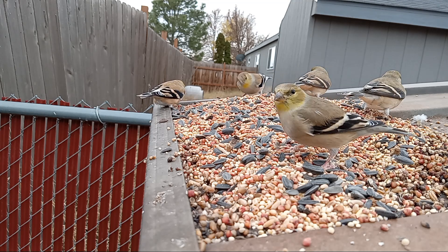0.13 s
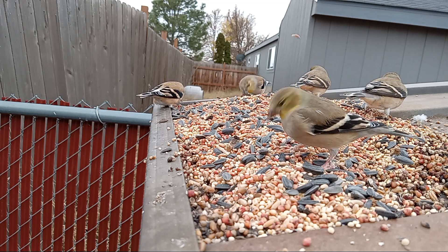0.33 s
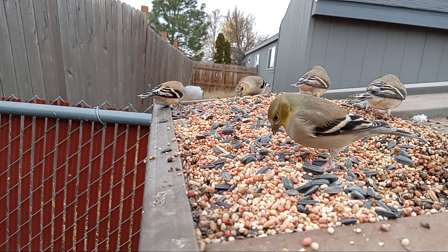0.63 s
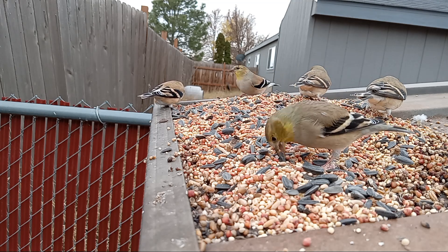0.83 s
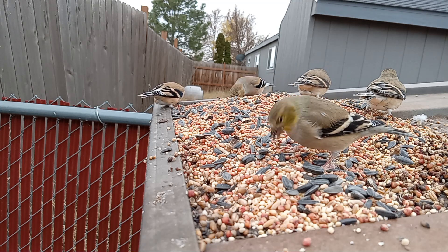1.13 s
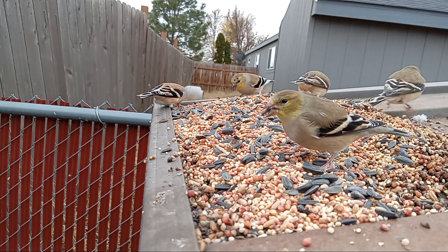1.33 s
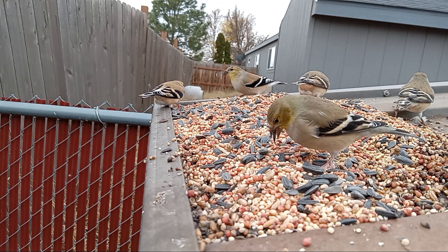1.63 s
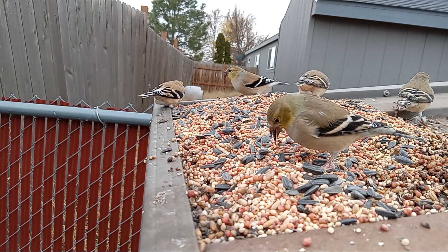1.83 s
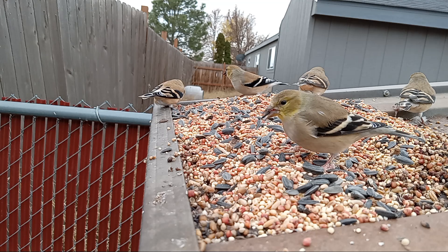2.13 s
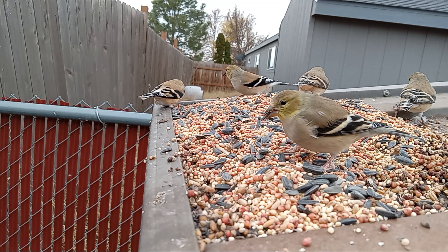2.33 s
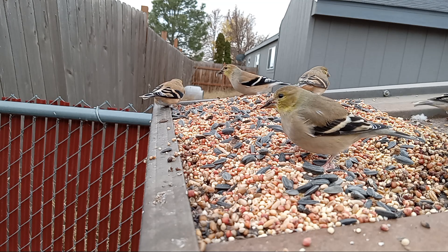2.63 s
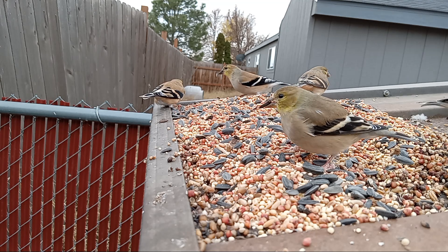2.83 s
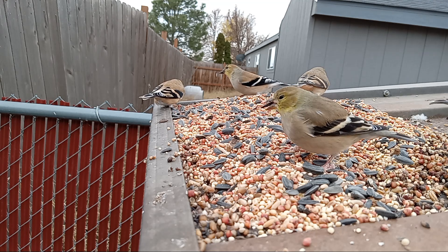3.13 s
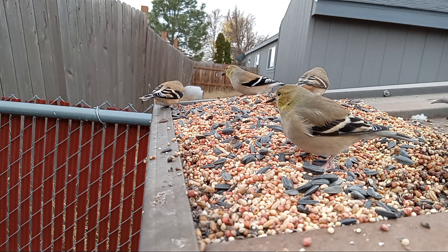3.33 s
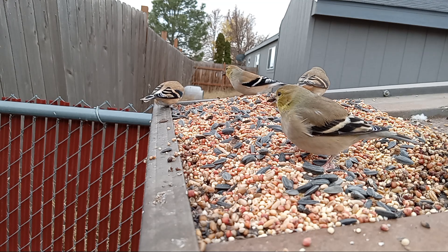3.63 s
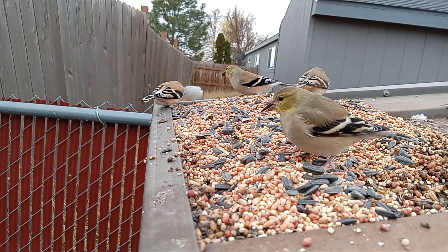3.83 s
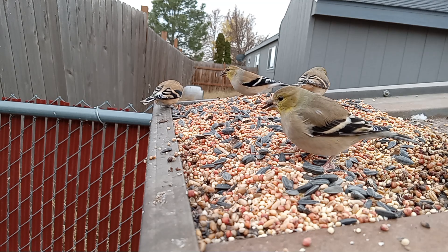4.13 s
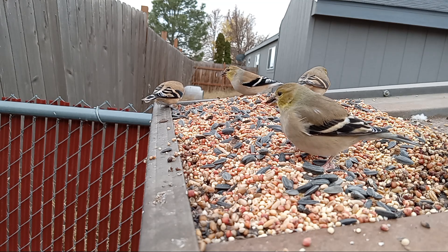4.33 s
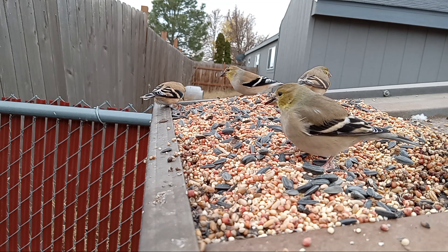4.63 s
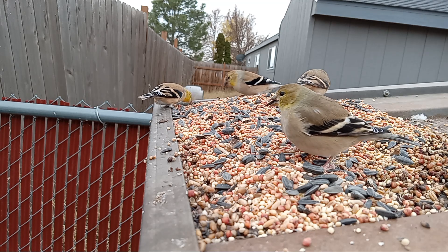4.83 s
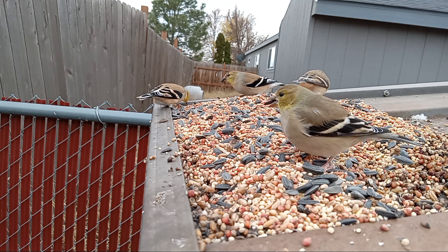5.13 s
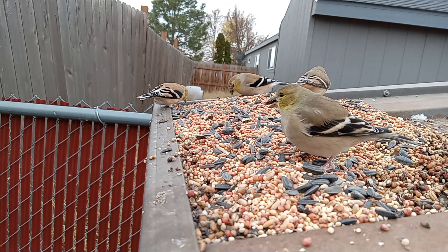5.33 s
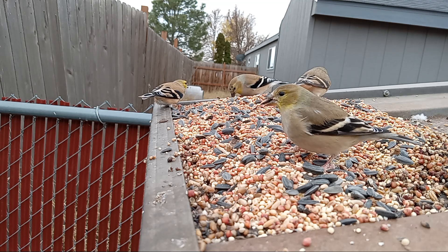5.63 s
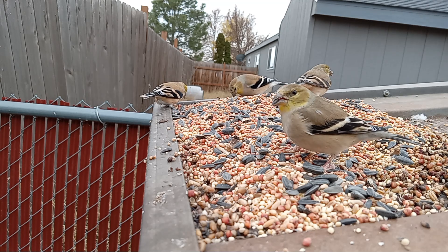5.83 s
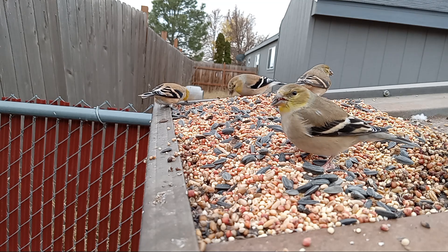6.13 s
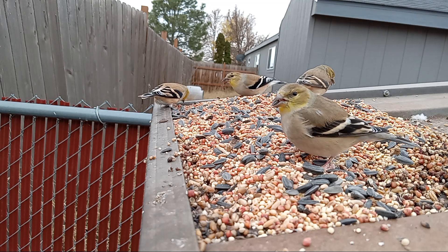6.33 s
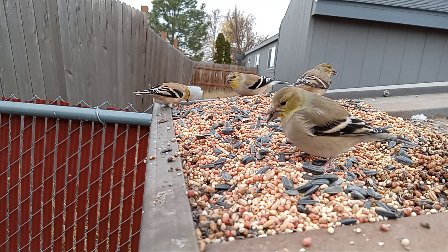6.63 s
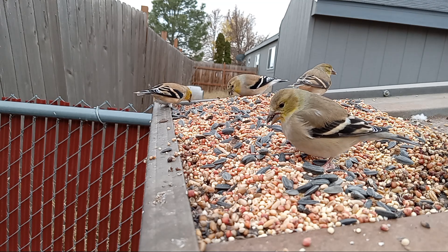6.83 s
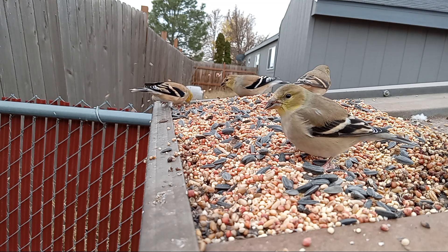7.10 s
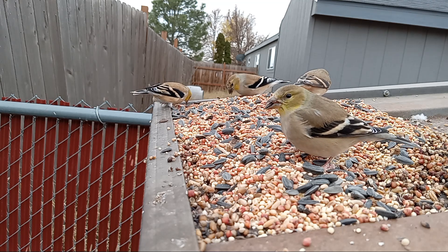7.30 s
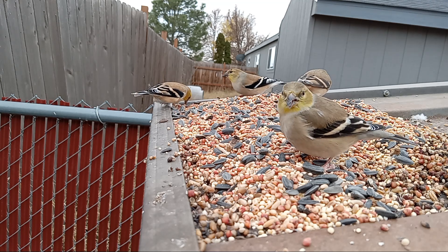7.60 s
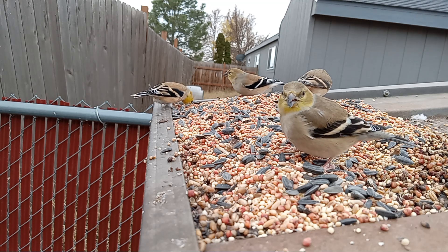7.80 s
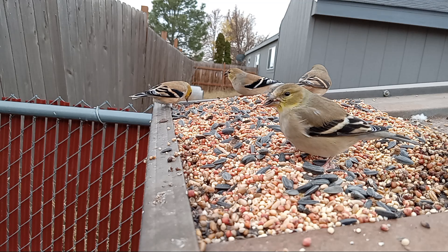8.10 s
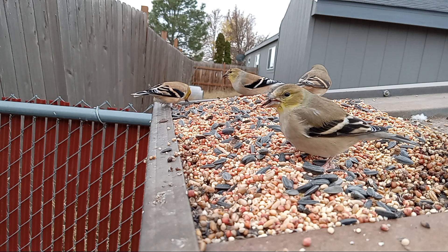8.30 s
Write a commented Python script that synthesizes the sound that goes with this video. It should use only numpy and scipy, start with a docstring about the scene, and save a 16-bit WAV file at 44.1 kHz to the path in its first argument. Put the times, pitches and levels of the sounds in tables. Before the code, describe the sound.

Several finches feed on a seed-covered tray, heard from its edge, extremely close. Beaks crunch into seed with bright clicks and hollow low thuds, sparse at first, crowding into a busy burst around two to three seconds. Dry bill clicks and cracking husks follow, then scattered pecks, soft hops and one quick little rattle near seven seconds. The quiet yard adds only a faint low rumble and thin hiss.

```python
"""Finches on a seed tray

Birds feed a hand's width from a microphone resting on their tray, in a quiet yard.
Beaks and feet crunch through seed (noise bursts), then strike the tray (fading noise and low, beating tones).
Husks, bills and loose seed click and crackle (filtered noise bursts); nibbling is softer noise.
Weight shifts hum (beating tones), dry ticks sound singly or rattle, and thin whistles (gliding sines) echo.
Behind them lies a faint yard rumble with a thin hiss (filtered noise)."""
import sys
import numpy as np
from scipy import signal
from scipy.fft import rfft, irfft, next_fast_len
from scipy.io import wavfile
from scipy.ndimage import uniform_filter1d, map_coordinates

SR = 44100
rng = np.random.default_rng(int(sys.argv[2]) if len(sys.argv) > 2 else 0)


def wrap_up_sound(samples):
    """Save the sound to the file named by the first command line argument, as 16-bit audio."""
    columns = np.atleast_2d(samples).T
    # keep every value between -1 and 1, then stretch to whole-number steps
    tamed = np.clip(columns, -1, 1)
    steps = np.round(tamed * 32767).astype(np.int16)
    wavfile.write(sys.argv[1], SR, steps)


N = 373086  # length in samples

# Levels in the tables are starting levels: later filters and gains shape them further.
# Beaks striking through seed to the tray: [contact t/s, seed click level/dB, knock level/dB,
# tray boom level/dB, boom centre f/Hz, first contact over the ring level/dB]
PECKS = [(0.4546, -20.5, -38.5, -49, 655, 9), (0.5171, -27.5, -47, -54.5, 429, 13),
         (0.5967, -22, -39, -52.5, 640, 9), (1.0234, -31.5, -46, -33, 426, 10),
         (1.3, -24.0, -48, -53.5, 329, 1.5), (1.5231, -35.5, -38.5, -45, 537, 14.5),
         (1.7997, -31.5, -39.5, -26.5, 294, 12.0), (1.9778, -25, -38.5, -25.5, 163.4, 10.5),
         (2.1646, -30.5, -33, -32.5, 439.6, 12.5), (2.331, -33, -38.0, -29.5, 158, 9),
         (2.4239, -30.5, -31, -34.5, 396, 12.5), (2.438, -22.5, -32.5, -33, 320, 9.5),
         (2.6226, -30, -33, -34.5, 482, 12), (2.657, -44.5, -30, -36, 750, 16),
         (2.7023, -34.5, -33.5, -32, 260.5, 12), (2.7357, -33.5, -34.5, -35, 208.7, 9),
         (2.8136, -24, -28.5, -38, 324.6, 6), (3.076, -36, -53.5, -39.5, 381, 0),
         (3.2495, -23.5, -33, -40, 520.0, 10.5), (4.2895, -28, -27, -41, 1007, 12),
         (4.4153, -30, -32, -45, 400, 9), (4.4352, -23, -37, -35, 334, 4),
         (4.8873, -27.5, -47.5, -52, 501, 7.5), (5.1193, -26.5, -50.5, -48.5, 337, 7.5),
         (5.5556, -27, -31.5, -34.5, 332, 5), (5.7524, -28, -37, -34.5, 393, 7),
         (5.8433, -25.5, -51, -46.5, 352, 5), (6.7438, -35.5, -41, -50, 348, 10.5),
         (7.1126, -33, -47.5, -43.5, 291, 14.5)]
# Feet landing softly on seed: [contact t/s, seed click level/dB, knock level/dB,
# tray boom level/dB, boom centre f/Hz]
HOPS = [(0.0024, -39, -54.5, -41.5, 300), (5.3133, -23.5, -33, -42.5, 436.0),
        (5.3416, -25, -34.5, -34, 367), (6.4094, -30, -33.5, -35.5, 328.4), (6.68, -39.5, -34, -39.0, 450),
        (8.178, -31.5, -41.5, -34, 451)]
# Husks cracked in the beak or dropped on the pile: [t/s, click level/dB, clack level/dB]
SNAPS = [(0.0261, -31.5, -51), (0.3636, -35, -42.5), (0.7824, -30, -30), (0.7905, -20.5, -37),
         (0.9559, -42, -50.5), (1.061, -39.5, -46.0), (1.349, -32, -49), (2.9375, -31, -42.5),
         (3.072, -37, -41), (3.927, -34.5, -45.5), (4.2852, -35.5, -29), (5.107, -34, -42),
         (5.659, -34, -47), (6.7964, -37, -47), (6.9969, -36.5, -42), (7.301, -38.5, -28.5),
         (7.3231, -36, -31), (7.8102, -53.5, -52), (8.112, -46, -47.5)]
# Loose seed pushed aside: [height of the push t/s, half length t/s, level/dB]
SHOVES = [(0.071, 0.066, -56.5), (0.644, 0.028, -46), (1.31, 0.014, -42.5), (1.426, 0.014, -49.5),
          (2.588, 0.028, -37), (2.696, 0.085, -41.5), (2.867, 0.023, -39), (3.356, 0.066, -47.5),
          (3.949, 0.034, -48.5), (4.369, 0.023, -43.5), (5.297, 0.0167, -44), (5.643, 0.039, -43.5),
          (5.861, 0.022, -43.5), (6.456, 0.042, -44), (6.661, 0.045, -46), (6.957, 0.075, -54.5),
          (8.236, 0.06, -58.5)]
# Tray humming as a bird shifts its weight: [height t/s, f/Hz at the height, level/dB]
SWAYS = [(0.095, 95, -40), (0.09, 165, -45), (0.07, 420, -51), (1.09, 270, -41), (1.92, 320, -39),
         (2.19, 158, -38), (2.37, 105, -41), (2.52, 150, -39.5), (4.52, 160, -46), (4.6, 340, -52),
         (6.47, 165, -47), (7.16, 370, -47), (7.12, 130, -46), (7.25, 160, -50), (8.32, 205, -44)]
# The nearest bill clicking on the seed it turns: [t/s, level/dB]
BILL_CLICKS = [(2.5499, -30.5), (3.0698, -27), (3.2423, -19), (3.3052, -21.5), (3.3393, -28), (3.378, -31),
               (3.438, -34), (3.8982, -20.5), (3.948, -29.5), (3.967, -34), (4.8501, -31.5), (4.898, -30),
               (7.768, -47.5)]
# Dry ticks, very short and bright: [t/s, level/dB]
TICKS = [(0.2117, -33.5), (3.1512, -33), (4.6131, -40.5)]
# Faint whistles: [start t/s, length t/s, start f/Hz, end f/Hz, level/dB before the echo]
WHISTLES = [(0.8, 0.11, 9300, 8300, -58.5), (0.916, 0.12, 7950, 7630, -66.5),
            (4.748, 0.038, 3300, 3190, -73.5), (7.339, 0.11, 6450, 6340, -74),
            (7.922, 0.116, 3410, 3290, -72.5)]
# The tray's low modes (its natural tones): [f/Hz]
TRAY_MODES = [97.7, 160, 214, 308, 337.2, 393.5, 441.3, 512.4]
# Time for tray and seed bed to fade by 60 dB: [f/Hz, fade t/s]
RING_FADE = [(100, 0.84), (350, 0.6), (750, 0.33), (3000, 0.19), (6000, 0.1)]
# Tone colour of a blow on the tray: [f/Hz, level/dB]
BLOW_COLOUR = [(35, 4), (85, 19.5), (600, 16), (1300, 9.5), (3000, 0.5), (4000, -5.5), (6200, -5.5),
               (8200, -13.5)]
# Tone colour of a breaking husk: [f/Hz, level/dB]
HUSK_COLOUR = [(200, -40), (1050, -7.5), (1600, 4.5), (2900, 3.5), (5300, 5), (7700, -2.5), (10500, -5.5)]
# Tone colour of shifting seed: [f/Hz, level/dB]
LOOSE_COLOUR = [(200, -5.5), (2000, 2.5), (4000, 0.5), (5800, 7), (7800, 0)]
# Tone colour of the rattle's ticks: [f/Hz, level/dB]
RATTLE_COLOUR = [(350, -12), (850, 9), (2400, 9), (6000, -8.5)]
# Resonances of a bill on seed, which also colour the dry ticks: [f/Hz, level/dB]
BILL_COLOUR = [(1400, -32.5), (2600, -4), (4400, -13), (5500, 7.5), (6850, 0), (7550, 1), (9500, -10.5)]
# Tone colour of the yard, before its overall level is set: [f/Hz, level/dB]
YARD_COLOUR = [(25, -40.5), (70, 1), (190, -6.5), (420, -21), (1500, -24), (6000, -38)]
# How the microphone passes each pitch: [f/Hz, level/dB]
MICROPHONE = [(8000, 0.5), (10500, -13.5), (13500, -30), (15500, -17.5)]

YARD_DB = -66.5
CRUSH_S = 0.04  # length of the crunch before a blow
TOP_HZ = 16000  # a steep cut removes everything from here up
KNOCK_HZ, CLICK_HZ = 1700, 6500  # where the knock and the click lie
BLOW_DB, HOP_CONTACT_DB = -3.5, -6.5  # gain of blows except the boom tone; foot contact over the ring
BOOM_DB, BOOM_RISE_S, BOOM_DECAY_S = -3.5, 0.0075, 0.036  # the mode that answers most at the struck spot
BOOM_SAG = 0.2  # the boom starts sharp by this share and sinks to its centre
BUILD_CYCLES = 4  # build-up time of a tray mode in cycles, so the lowest come last
SNAP_RING_DB, SNAP_CLACK_DB, SNAP_CLICK_DB = -6.5, 4.5, 0.5  # weights of ring, clack and click
RATTLE_S, RATTLE_GAP_S, RATTLE_DB = 6.891, 0.0173, -39.5  # start, average spacing, middle level
SWAY_S = 0.07  # half length of a hum
SWAY_SINK = 1.2  # the hum sinks by this many octaves a second as lower modes take over
BEAT_DEPTH, BEAT_RATE = 0.68, 65  # strength of the beating; random points a second


def amp(db):
    """Turn decibels into gain."""
    return 10 ** (np.asarray(db) / 20)


def unit(x):
    """Scale to an average strength (rms) of 1."""
    return x / np.sqrt(np.mean(x ** 2) + 1e-20)


def along(points, hz):
    """Read (f/Hz, value) points along a log pitch axis."""
    f, value = np.transpose(points)
    return np.interp(np.log(hz + 1), np.log(f + 1), value)


def wobble(rate, size):
    """Draw a smooth random curve with rate points a second."""
    points = rng.standard_normal(int(size * rate / SR) + 4)
    return map_coordinates(points, [np.arange(size) * rate / SR])


def coloured(x, *spectra):
    """Filter a sound by the sum of (f/Hz, level/dB) curves, with no sound ahead of its cause."""
    m = 2 * next_fast_len(len(x) // 2 + 2048)
    hz = np.fft.rfftfreq(m, 1 / SR)
    gain = amp(sum(along(s, hz) for s in spectra))
    # folding the cepstrum gives the filter its earliest possible response
    cepstrum = irfft(np.log(gain))
    cepstrum[1:m // 2] *= 2
    cepstrum[m // 2 + 1:] = 0
    return irfft(rfft(x, m) * np.exp(rfft(cepstrum)), m)[:len(x)]


def add(track, s, sound):
    """Mix a sound into the track from time s, trimming what lies outside."""
    start = round(s * SR)
    part = sound[max(-start, 0):max(N - start, 0)]
    track[max(start, 0):][:len(part)] += part


def contact(t, life):
    """A hard touch: a brief crunch with one sharp push at its height."""
    u = 2 * t / life
    crunch = rng.standard_normal(len(t)) * (u * np.exp(-u)) ** 2
    crunch /= np.linalg.norm(crunch)
    crunch[np.argmax(u >= 1)] += 0.7
    return crunch * np.sqrt(life * SR) / np.linalg.norm(crunch)


def dense_ring(t, speed):
    """Crowded upper modes and jostled seeds ring as noise; the treble dies first."""
    level_db = 2.7 * wobble(500, len(t))
    noise = unit(rng.standard_normal(len(t)) * amp(level_db))
    hz, s, z = signal.stft(noise, SR, nperseg=256)
    fade_db = -60 * s / along(RING_FADE, hz)[:, None]
    return signal.istft(z * amp(speed * fade_db), SR)[1][:len(t)]


def tray_modes(t, scatter_db):
    """The low modes build up and fade, in a new random mix for each strike."""
    hz = np.array(TRAY_MODES)
    strength = unit(amp(scatter_db * rng.standard_normal(len(hz))))
    gain = strength * rng.choice([-1, 1], len(hz))
    fade = np.exp(-np.log(1000) * t / along(RING_FADE, hz)[:, None])
    build = 1 - np.exp(-hz[:, None] * t / BUILD_CYCLES)
    return gain @ (build * fade * np.sin(2 * np.pi * hz[:, None] * t))


def own_resonances(depth_db, count=80):
    """Each sound gets its own random peaks and gaps about an even level: (f/Hz, level/dB)."""
    hz = np.geomspace(400, TOP_HZ, count)
    power = amp(depth_db * np.clip(rng.standard_normal(count), -2, 2)) ** 2
    power /= uniform_filter1d(power, size=count // 7)
    power[0] = 1  # leaves the bass alone
    return list(zip(hz, 10 * np.log10(power)))


def after_crush(sound, rise, crush_db):
    """Seed gives way in a swelling noise crunch just before the sound."""
    before = np.arange(round(CRUSH_S * SR))[::-1] / SR
    crush = amp(crush_db) * rng.standard_normal(len(before)) * np.exp(-before / rise)
    return np.concatenate([crush, sound])


def beating(hz, swell):
    """Close modes make a swell waver in level and pitch; hz is given per sample."""
    waver = wobble(BEAT_RATE, len(hz)) + 1j * wobble(BEAT_RATE, len(hz))
    swing = swell * (1 + BEAT_DEPTH * waver)
    swing *= np.linalg.norm(swell) / np.linalg.norm(swing)
    return np.imag(swing * np.exp(2j * np.pi * np.cumsum(hz) / SR))


def grains(rate, spread_db):
    """Scatter about rate impulses a second, very unequal in size, with rms 1."""
    hit = rng.random(N) < rate / SR
    return unit(hit * rng.standard_normal(N) * amp(spread_db * rng.standard_normal(N)))


def tray_blows(rows, crush_rise):
    """Each blow brushes the seed, hits bottom, and the tray rings."""
    out, t = np.zeros(N), np.arange(3 * SR // 4) / SR
    for s, click, knock, boom, boom_hz, contact_db in rows:
        upper = coloured(dense_ring(t, speed=0.83), [(380, -4.5), (700, 2.5)])
        touch = amp(contact_db) * contact(t, life=0.0021)
        blow = touch + upper + amp(-23.5) * tray_modes(t, scatter_db=2.5)
        blow = after_crush(blow, rise=crush_rise, crush_db=-3.5)
        # the spot that is struck decides which of the low modes answer
        low = [(boom_hz / 5, boom - 25), (boom_hz / 2, boom - 8),
               (boom_hz, boom + 2), (boom_hz * 1.47, boom - 8)]
        force = low + [(KNOCK_HZ, knock), (CLICK_HZ, click)]
        spot = own_resonances(depth_db=5)
        add(out, s - CRUSH_S, amp(BLOW_DB) * coloured(blow, BLOW_COLOUR, force, spot))
        swell = (1 - np.exp(-t / BOOM_RISE_S)) * np.exp(-t / BOOM_DECAY_S)
        hz = boom_hz * (1 + BOOM_SAG * np.exp(-2 * t / BOOM_DECAY_S))
        add(out, s, amp(boom + BOOM_DB) * beating(hz, swell))
    return out


def yard():
    """Filtered noise makes a distant rumble and a thin hiss of air, slowly varying in level."""
    air = unit(coloured(rng.standard_normal(N), YARD_COLOUR))
    return amp(YARD_DB + 1.1 * wobble(2.5, N)) * air


def sways():
    """Shifting weight stirs close low modes: an uneven, sinking hum with no click."""
    out, t = np.zeros(N), np.arange(SR // 2) / SR
    t = t - t.mean()
    for s, hz, db in SWAYS:
        sinking_hz = hz * 2 ** (-SWAY_SINK * t)
        swell = np.exp(-(t / SWAY_S) ** 2)
        add(out, s + t[0], amp(db) * beating(sinking_hz, swell))
    return out


def loose_seed():
    """Under feet and beaks, seeds of several sizes click against each other."""
    t = np.arange(N) / SR
    push_power = sum(amp(db) ** 2 * np.exp(-2 * ((t - s) / half) ** 2) for s, half, db in SHOVES)
    short, clicks = t[:SR // 10], np.zeros(N)
    for _ in range(10):  # ten different seed sounds
        tick = contact(short, life=0.0005) + amp(-17) * dense_ring(short, speed=1.3)
        tick = coloured(tick, LOOSE_COLOUR, own_resonances(depth_db=9))
        clicks += signal.fftconvolve(grains(rate=85, spread_db=1.5), tick)[:N]
    return np.sqrt(push_power) * unit(clicks)


def hops():
    """Feet are cushioned by the seed: mostly ring, little contact."""
    return tray_blows([(*hop, HOP_CONTACT_DB) for hop in HOPS], crush_rise=0.0068)


def snaps():
    """A husk strains and breaks: bright, short, too light to move the tray."""
    out, t = np.zeros(N), np.arange(SR // 4) / SR
    for s, click, clack in SNAPS:
        crack = contact(t, life=0.0013) + amp(SNAP_RING_DB) * dense_ring(t, speed=1.32)
        crack = after_crush(crack, rise=0.0012, crush_db=-10)
        seed = own_resonances(depth_db=5)
        force = [(3600, clack + SNAP_CLACK_DB), (5500, click + SNAP_CLICK_DB)]
        add(out, s - CRUSH_S, coloured(crack, HUSK_COLOUR, force, seed))
    return out


def nibbling():
    """Bills rub softly on their seeds at random moments throughout."""
    out, t = np.zeros(N), np.arange(SR // 10) / SR
    for s in rng.uniform(0, N / SR, size=60):
        rub = after_crush(dense_ring(t, speed=1), rise=0.004, crush_db=0)
        seed = own_resonances(depth_db=7)
        add(out, s, amp(rng.uniform(-8, 0)) * coloured(rub, BILL_COLOUR, seed))
    return amp(-79.5) * unit(out)


def ticks():
    """Dry ticks: very short, bright clicks with no ring."""
    out, t = np.zeros(N), np.arange(SR // 10) / SR
    for s, db in TICKS:
        add(out, s, amp(db) * coloured(contact(t, life=0.00086), BILL_COLOUR))
    return out


def pecks():
    """A beak lands hard: crunching seed, a sharp contact, then the ring."""
    return tray_blows(PECKS, crush_rise=0.0037)


def whistles():
    """Faint, nearly pure calls glide down and echo between fence and house."""
    out = np.zeros(N)
    for s, length, start_hz, end_hz, db in WHISTLES:
        u = np.linspace(0, 1, int(length * SR))
        hz = start_hz + (end_hz - start_hz) * u
        swell = np.sqrt(np.abs(np.sin(np.pi * u)))
        add(out, s, amp(db) * swell * np.sin(2 * np.pi * np.cumsum(hz) / SR))
    t = np.arange(SR // 2) / SR
    echo = rng.standard_normal(len(t)) * np.exp(-t / 0.063)
    return out + 0.55 * signal.fftconvolve(out, echo / np.linalg.norm(echo))[:N]


def bill_clicks():
    """The seed slips, then the bill shuts on it: high and dry, around the same few resonances."""
    out, t = np.zeros(N), np.arange(SR // 10) / SR
    for s, db in BILL_CLICKS:
        click = contact(t, life=0.0014) + amp(-9) * dense_ring(t, speed=1)
        click = after_crush(click, rise=0.0025, crush_db=-5.5)
        click = coloured(click, BILL_COLOUR, own_resonances(depth_db=4))
        add(out, s - CRUSH_S, amp(db) * click)
    return out


def rattle(count):
    """A quick, uneven run of differing dry ticks, perhaps a claw slipping along the rim."""
    out, t = np.zeros(N), np.arange(SR // 10) / SR
    for k, (late, louder) in enumerate(rng.standard_normal((count, 2))):
        tick = contact(t, life=0.0013) + amp(-15) * dense_ring(t, speed=1.3)
        tick = coloured(tick, RATTLE_COLOUR, own_resonances(depth_db=5))
        s = RATTLE_S + k * RATTLE_GAP_S + 0.0018 * late
        add(out, s, amp(RATTLE_DB + 2 * louder) * tick)
    return out


def scene():
    """Mix everything as heard from the edge of the tray."""
    tray = sways() + hops() + pecks() + rattle(count=8)
    seed = loose_seed() + snaps() + nibbling() + bill_clicks()
    return (yard() + tray + seed + ticks() + whistles())[None]


def record(dry):
    """The microphone dulls the top; a separate steep cut removes everything from 16 kHz up."""
    m = next_fast_len(N + SR // 2)
    heard = coloured(dry[0], MICROPHONE)
    kept = np.fft.rfftfreq(m, 1 / SR) < TOP_HZ
    return irfft(rfft(heard, m) * kept, m)[None, :N]


dry = scene()
out = record(dry)
wrap_up_sound(out)
```